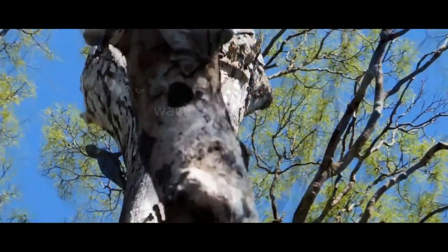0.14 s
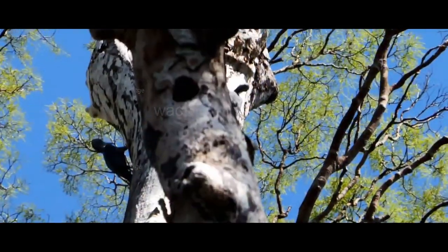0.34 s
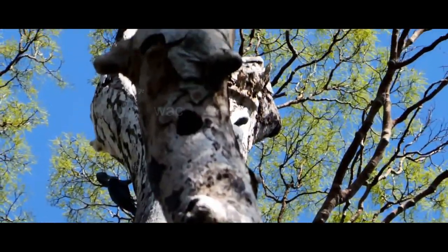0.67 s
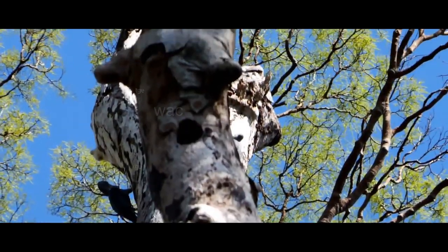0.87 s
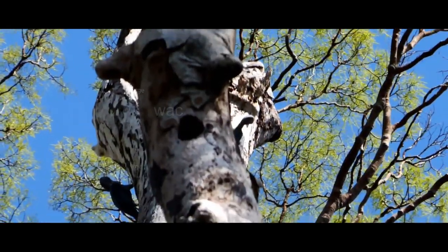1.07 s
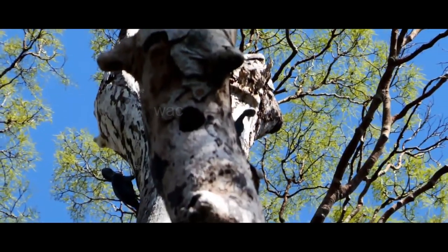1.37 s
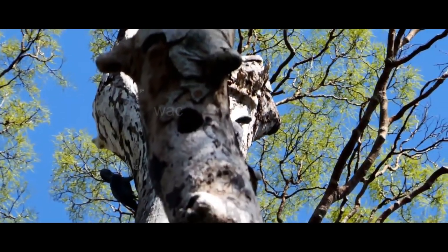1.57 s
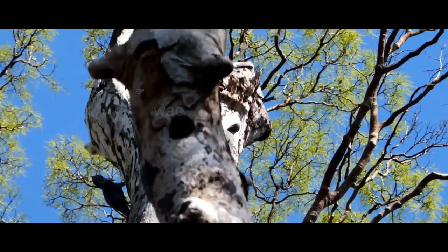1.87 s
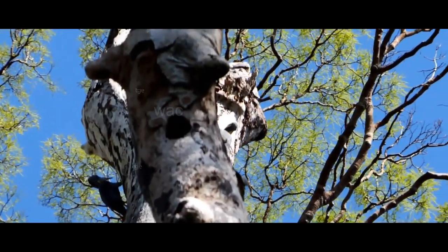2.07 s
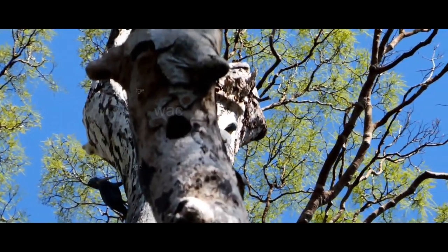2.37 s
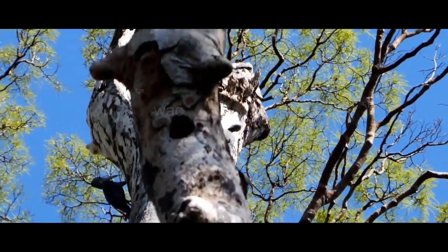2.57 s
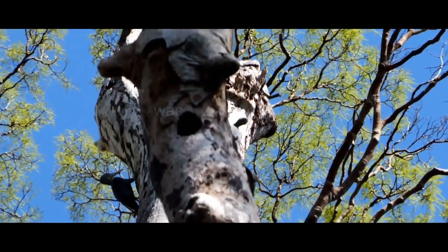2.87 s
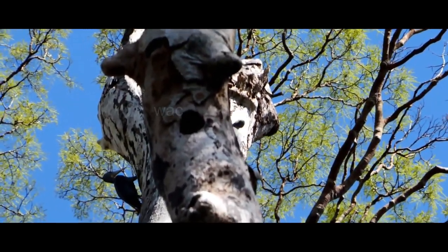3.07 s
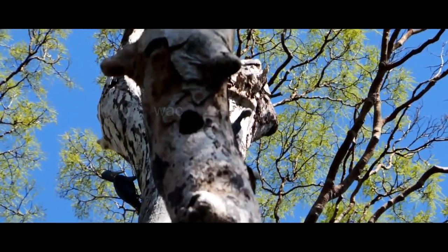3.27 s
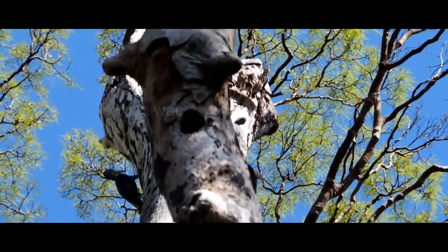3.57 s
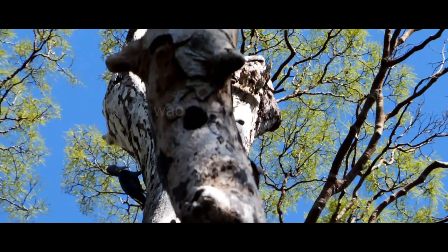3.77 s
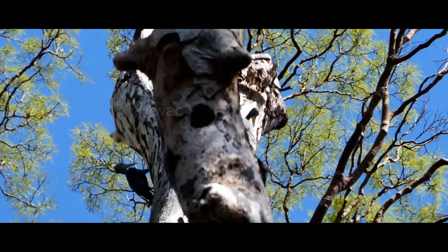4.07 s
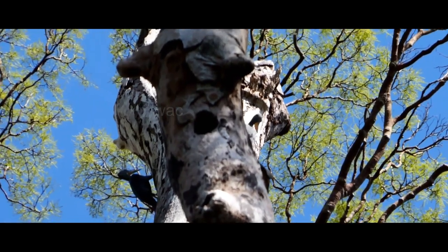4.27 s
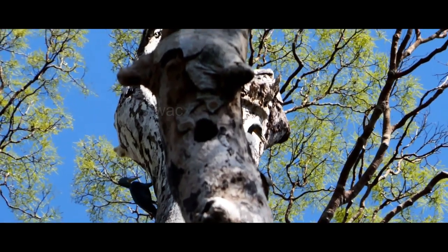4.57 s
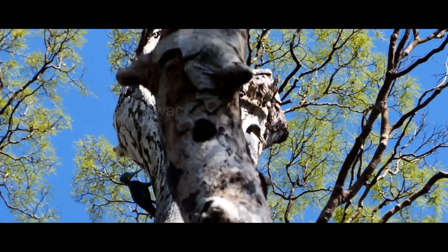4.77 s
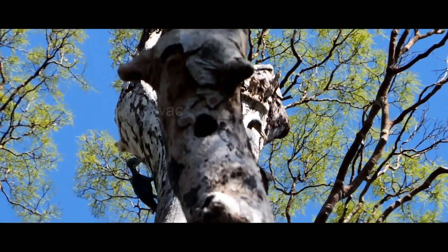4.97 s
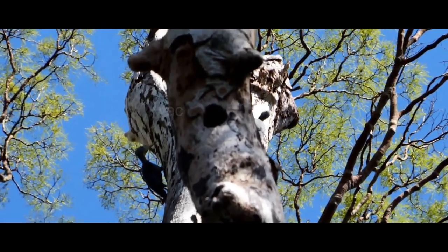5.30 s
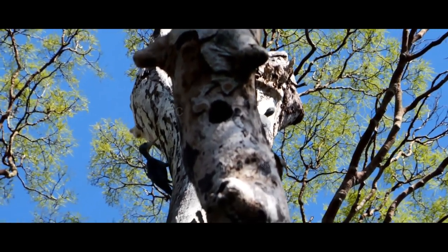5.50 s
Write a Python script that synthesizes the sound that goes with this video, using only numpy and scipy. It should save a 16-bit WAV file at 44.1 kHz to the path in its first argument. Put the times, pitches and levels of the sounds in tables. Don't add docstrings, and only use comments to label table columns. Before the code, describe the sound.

Outdoor woodland in stereo: a near bush cricket rasps about twenty times a second on the left, over a continuous bright hiss of countless others. Neighbours chirr at left and centre, and tree crickets whistle thin throbbing tones. Faint bird trills come near the start and again past the middle, with tiny wood knocks and a low machine hum underneath.

```python
import sys
import numpy as np
from scipy import signal
from scipy.fft import rfft, irfft, next_fast_len
from scipy.io import wavfile
from scipy.ndimage import uniform_filter1d

SR = 44100
rng = np.random.default_rng(int(sys.argv[2]) if len(sys.argv) > 2 else 0)


def master_out(mix):
    frames = np.transpose(np.atleast_2d(mix))
    ceiling = np.clip(frames, -1, 1)
    pcm = np.round(ceiling * 32767).astype(np.int16)
    wavfile.write(sys.argv[1], SR, pcm)


def linear_from_db(decibels):
    return 10 ** (np.asarray(decibels, float) / 20)


N = 248724
T = np.arange(N) / SR
SIDES = np.array([[1], [-1]])

# time from the middle stroke in seconds, share of the pitch, level in dB.
WING_STROKES = [
    (-.0112, .955, -7),
    (0, 1, 0),
    (.0111, 1, 0),
]
# frequency in Hz, left minus right in dB.
BALANCE = [(60, 3), (110, 1.5), (200, 1.5), (380, 0), (700, 2), (1290, 0), (2380, 0.5), (4400, 1),
           (8120, 0), (15000, 7)]


def level(x, db):
    return x * linear_from_db(db) / np.sqrt(np.mean(np.abs(x) ** 2))


def walk(rate, channels=1):
    hold = max(int(SR / rate), 2)
    drawn = rng.standard_normal((channels, 4096))[:, :N // hold + 1]
    held = np.repeat(drawn, hold, axis=1)
    return 1.1 * uniform_filter1d(uniform_filter1d(held, hold), hold)[:, :N]


def on_log(table, hz):
    table_hz, values = np.transpose(table)
    return np.interp(np.log(np.maximum(hz, 1)), np.log(table_hz), values)


def tone(hz, width_hz, steady, channels=2):
    paths = steady + walk(2 * width_hz, channels) + 1j * walk(2 * width_hz, channels)
    carrier = np.exp(2j * np.pi * np.cumsum(hz + 0 * T) / SR)
    return level(np.imag(paths * carrier), 0)


def leaves(x, t60_s):
    s = T[:SR // 2]
    tail = rng.standard_normal((2, len(s))) * np.exp(-np.log(1000) * s / t60_s)
    tail = tail / np.sqrt(np.sum(tail ** 2) / 2)
    return signal.fftconvolve(x[None], tail, axes=1)[:, :N]


def placed(x, pan_db, wet_db):
    direct = np.array([np.roll(x, 4), x]) * linear_from_db(SIDES * pan_db / 2)
    return direct + linear_from_db(wet_db) * leaves(x, .25)


def cricket(chirps, hz, second_db, fall=.135, stroke_s=.009):
    out, s = np.zeros(N + SR), T[:int(stroke_s * SR)]
    u = np.clip(s / stroke_s, 0, 1)
    shape = np.sin(np.pi * u ** 1.12) ** 0.96
    at, db, strokes = np.transpose(chirps)
    for k, (lag, share, stroke_db) in enumerate(WING_STROKES):
        chance = rng.standard_normal((len(at), 3))
        pitch = hz * share * (1 + .005 * chance[:, :1])
        turns = pitch * (s - fall * s * u ** 3 / 4) + chance[:, 1:2]
        ring = np.sin(2 * np.pi * turns) + linear_from_db(second_db) * np.sin(4 * np.pi * turns)
        size = linear_from_db(db + stroke_db + .8 * chance[:, 2]) * (strokes > k)
        start = ((at + lag - .36 * stroke_s) * SR).astype(int) + SR // 2
        np.add.at(out, start[:, None] + np.arange(len(s)), size[:, None] * shape * ring)
    return out[SR // 2:SR // 2 + N]


def steady_song(times):
    return np.transpose([times, 0 * times, 0 * times + len(WING_STROKES)])


def near_cricket():
    # time of a middle stroke in seconds, chirps sung so far.
    near_song = [(.033, 0), (.2259, 4), (.8235, 17), (1.4325, 30), (1.6605, 35), (1.691, 36), (2.364, 50),
                 (2.503, 53), (2.8805, 61), (3.3015, 70), (3.729, 79), (4.101, 87), (4.198, 89),
                 (4.2225, 90), (4.458, 95), (4.688, 100), (5.1545, 110), (5.625, 120)]
    stumbles = [
        (35, 2),
        (89, 1),
    ]
    s, count = np.transpose(near_song)
    chirps = steady_song(np.interp(np.arange(count[-1] + 1), count, s))
    chirps[:, 1] = -23.5 + 1.26 * rng.standard_normal(len(chirps))
    for number, strokes in stumbles:
        chirps[number, 2] = strokes
    rasp = cricket(chirps, hz=7140., second_db=-1.5, fall=0.13, stroke_s=.0082)
    return linear_from_db(-10.5) * placed(rasp, pan_db=24, wet_db=-30)


def mate(song, hz, db, pan_db, second_db):
    s, count = np.transpose(song)
    times = np.interp(np.arange(1, count[-1]) - .1, count, s)
    return linear_from_db(db) * placed(cricket(steady_song(times), hz, second_db), pan_db, wet_db=-12.0)


def neighbours():
    # time in seconds, chirps sung so far.
    left_song = [(0, -.4), (.47, 9.14), (1.41, 28.62), (2.82, 57.39), (4.23, 85.75), (5.64, 113.56)]
    front_song = [(0, .4), (.47, 11.23), (1.41, 32.54), (3.29, 74.7), (5.64, 127.7)]
    left = mate(left_song, hz=8200., db=-26.5, pan_db=12, second_db=-20)
    front = mate(front_song, hz=8600., db=-26.5, pan_db=1.7, second_db=-22)
    return left + front


def far_crickets(count):
    out = 0
    for tempo, start, pitch in rng.random((count, 3)):
        times = np.arange(start / 20, N / SR, 1 / (19.5 + 3.5 * tempo))
        out = out + cricket(steady_song(times), 7700 + 1100 * pitch, second_db=-54)
    return level(leaves(out, 0.28), -41.0)


def throb(count, depth):
    gap_share = .31
    from_gap = (count + .5) % 1 - .5
    return 1 - np.clip(depth, 0, 1) * np.exp(-from_gap ** 2 / gap_share ** 2)


def loud_whistler():
    # time of a gap in seconds, throbs so far, pitch in Hz.
    whistle = [(-.02, 0, 5386), (1.215, 10, 5401), (2.454, 20, 5422), (2.775, 23, 5431), (3.27, 27, 5441),
               (4.145, 34, 5452), (4.617, 38, 5457), (5.725, 47, 5467)]
    # time in seconds, level in dB, depth of the gaps from 0 to 1, left minus right in dB.
    whistle_effort = [(0, -38, .4, -3), (.9, -35.5, 0.8, 10), (1.5, -37, 1, -11), (2.08, -43.5, 0.3, -4),
                      (2.26, -40, 0.5, -12), (2.46, -50, 0.9, 4), (2.65, -43, 0.2, 9), (3.3, -40, 0.7, 14),
                      (3.6, -36, 1, 3), (4.3, -36.5, 0.28, 1), (4.9, -32, 0.96, -1), (5.4, -41.5, 0.26, -5),
                      (5.64, -32, 1, -6)]
    s, count, hz = np.transpose(whistle)
    at, *effort = np.transpose(whistle_effort)
    db, depth, pan_db = (np.interp(T, at, column) for column in effort)
    line = tone(np.interp(T, s, hz), width_hz=10, steady=2.8)
    return line * linear_from_db(db + SIDES * pan_db / 2) * throb(np.interp(T, s, count), depth)


def faint_whistlers():
    # first and last pitch in Hz, line width in Hz, throbs a second, time of one gap in seconds.
    faint_voices = [
        (3024, 3028, 20, 1.39, .42),
        (5610, 5672, 25, 8.1, 1.59),
        (5726, 5726, 16, 8.1, 1.69),
    ]
    # level in dB, gap depth from 0 to 1, left minus right in dB, swell time in seconds, swell in dB.
    faint_effort = [
        (-52.5, 0.16, 4, 2., 3),
        (-54.5, 1, 11, 1.9, 14.5),
        (-48.5, 0.9, 16, 1.6, -2),
    ]
    out = 0
    for voice, effort in zip(faint_voices, faint_effort):
        first, last, width, rate, gap = voice
        db, depth, pan_db, swell_at, swell_db = effort
        line = tone(first + (last - first) * T / T[-1], width, steady=0.45)
        swell = swell_db * np.exp(-((T - swell_at) / .55) ** 2)
        strength = linear_from_db(db + swell + 1.2 * walk(2.74) + SIDES * pan_db / 2)
        out = out + line * strength * throb((T - gap) * rate, depth)
    return out


def cicada():
    # multiple of the click rate, level in dB.
    body_lines = [(26, -55), (27, -54), (28, -53), (29, -58), (30, -58), (31, -61)]
    click_hz = 350.2 * (1 + 0.0023 * walk(1.5)[0])
    comb = sum(linear_from_db(db) * tone(k * click_hz, width_hz=45, steady=0.) for k, db in body_lines)
    return linear_from_db(8 - 1.1 * SIDES) * comb


def bird():
    # start in seconds, length in seconds, top and bottom pitch in Hz, notes a second, level in dB.
    trills = [
        (.53, .29, 4350, 3620, 33, -47),
        (.79, .28, 5400, 4950, 33, -48),
        (3.42, .33, 4350, 3620, 33, -47),
        (3.66, .36, 5400, 4950, 33, -47),
    ]
    out, waver = np.zeros(N), walk(40)[0]
    for at, length, top_hz, bottom_hz, rate, db in trills:
        through = np.clip((T - at) / length, 0, 1)
        note = ((T - at) * rate + 0.6 * waver) % 1
        hz = (top_hz + (bottom_hz - top_hz) * note) * (1 - .035 * through)
        envelope = np.sin(np.pi * through ** 0.55) * np.sin(np.pi * note) ** .5
        out += linear_from_db(db) * envelope * np.sin(2 * np.pi * np.cumsum(hz) / SR)
    return linear_from_db(8) * leaves(out, .2)


def knocks():
    # start in seconds, peak in dB, resonance in Hz, time to fall 60 dB in seconds.
    wood_knocks = [
        (.05, -45.5, 126, 0.12),
        (3.625, -49, 1710, 0.096),
        (3.645, -51, 910, 0.066),
        (4.601, -49, 810, 0.074),
        (4.991, -46.5, 770, 0.14),
        (5.045, -47, 573, 0.14),
    ]
    out = np.zeros(N)
    for at, db, hz, t60_s in wood_knocks:
        s = np.maximum(T - at, 0)
        puff = rng.standard_normal(N) * np.exp(-np.log(1000) * s / t60_s) * (T > at)
        ring = signal.lfilter(*signal.iirpeak(hz, 4.5, SR), puff)
        out += linear_from_db(db) * level(ring, -21.5)
    return out


def hum():
    # frequency in Hz, level in dB, line width in Hz.
    machine = [(37.5, -49.5, 0.99), (48.3, -49.5, 1.48), (78.7, -56, 3), (97.1, -56, 1.99),
               (147.4, -65, 3.3), (270.3, -52.5, 1.394), (381, -73.5, 4.26), (444.5, -70, 4.96),
               (539, -64.5, 2.37), ]
    whine_levels = [-65, -68, -71, -69, -68]
    motor = [(567.4 * (k + 1), db, 4) for k, db in enumerate(whine_levels)]
    out = 0
    for hz, db, width in [*machine, *motor]:
        gain = linear_from_db(db + SIDES * on_log(BALANCE, hz) / 2)
        out = out + gain * tone(hz, width, steady=5., channels=1)
    return out


def bed(spectrum, db, alike_least, lag, swell_db, flicker_db):
    # frequency in Hz, likeness of left and right from 0 to 1.
    likeness = [(60, 0.83), (130, 0.98), (290, 0.92), (640, 0.87), (1410, 0.66), (3100, 0.26), (6820, 0),
                (15000, -0.09)]
    size = next_fast_len(N)
    hz = np.arange(size // 2 + 1) * SR / size
    mid, side = rfft(rng.standard_normal((2, size)))
    alike = np.clip(on_log(likeness, hz), alike_least, .995)
    field = np.sqrt(1 + alike) * mid + SIDES * np.sqrt(1 - alike) * side
    colour = linear_from_db(on_log(spectrum, hz) + SIDES * on_log(BALANCE, hz) / 2) * field
    colour[0] *= np.exp(-2j * np.pi * hz * lag / SR)
    out, swell = 0, walk(1.0)
    lowest = np.floor(2 * np.log2(spectrum[0][0]))
    highest = 2 * np.log2(spectrum[-1][0])
    for step in np.arange(lowest, highest + 1):
        share = np.clip(1 - np.abs(2 * np.log2(hz + 1) - step), 0, 1)
        band = irfft(colour * share, size)[:, :N]
        out = out + band * linear_from_db(swell_db * swell + flicker_db * walk(12))
    return level(out, db)


def crowd_hiss():
    # frequency in Hz, density in dB per Hz.
    crowd_spectrum = [(2650, -72), (4500, -16.5), (4750, -16.5), (5240, -7), (5530, -3), (6800, 0.5),
                      (7380, -2.5), (8320, 1), (9020, -3), (10500, -7.5), (12100, -17), (13600, -14.5),
                      (14200, -13.5), (16200, -10.5), (16500, -52)]
    return bed(crowd_spectrum, -26.5, alike_least=0.3, lag=4.5, swell_db=.1, flicker_db=.7)


def woodland_air():
    # frequency in Hz, density in dB per Hz.
    air_spectrum = [(15, -32), (25, -4), (59, -7.5), (188, -12), (272, -12), (317, -11), (1130, -13.5),
                    (2540, -20.5), (3030, -15), (3240, -19), (3780, -14), (4120, -18.5), (4250, -23),
                    (6110, -58), (10300, -120)]
    return bed(air_spectrum, -43.5, alike_least=0.071, lag=0.8, swell_db=.1, flicker_db=0.58)


def scene():
    crickets = near_cricket() + neighbours() + far_crickets(count=5)
    whistles = loud_whistler() + faint_whistlers()
    others = cicada() + bird() + knocks() + hum()
    return crickets + whistles + others + crowd_hiss() + woodland_air()


def top_cut(x):
    return signal.sosfilt(signal.butter(12, 15810, fs=SR, output="sos"), x)


def record(dry):
    bias = [
        [-.00125],
        [-.00093],
    ]
    mix = dry + bias
    return top_cut(mix)


dry = scene()
out = record(dry)
master_out(out)
```